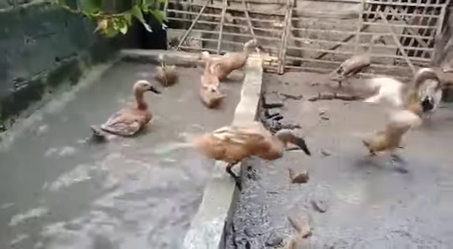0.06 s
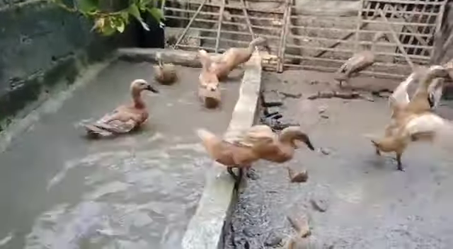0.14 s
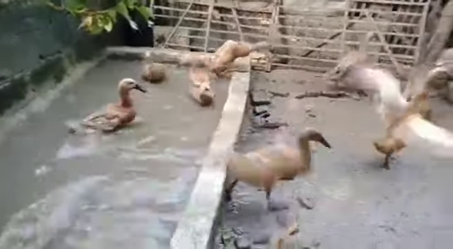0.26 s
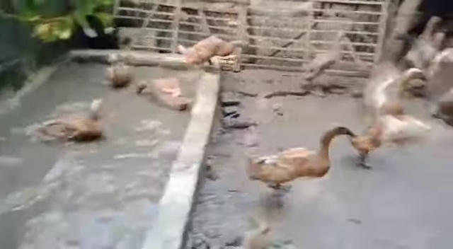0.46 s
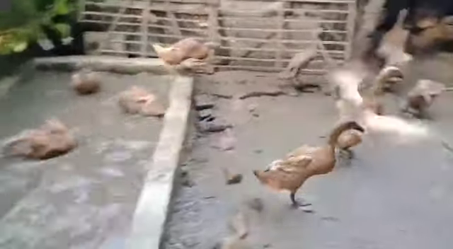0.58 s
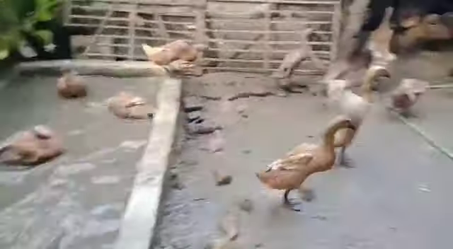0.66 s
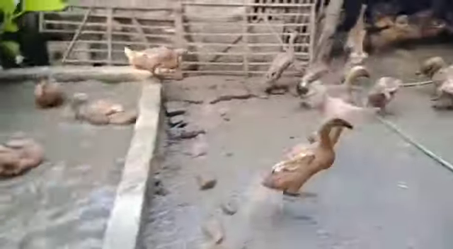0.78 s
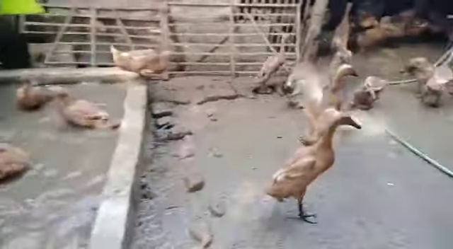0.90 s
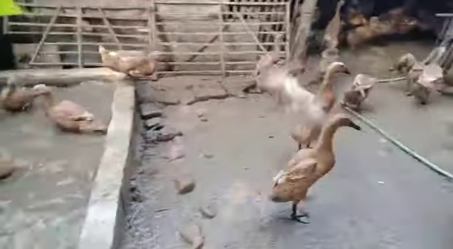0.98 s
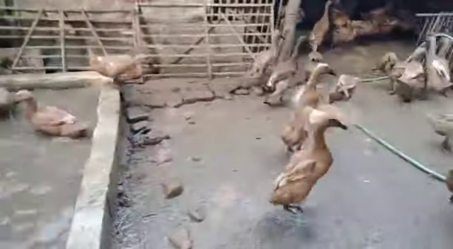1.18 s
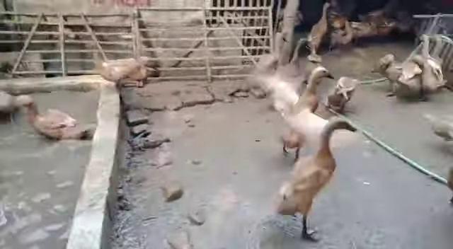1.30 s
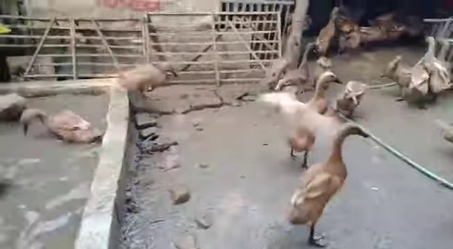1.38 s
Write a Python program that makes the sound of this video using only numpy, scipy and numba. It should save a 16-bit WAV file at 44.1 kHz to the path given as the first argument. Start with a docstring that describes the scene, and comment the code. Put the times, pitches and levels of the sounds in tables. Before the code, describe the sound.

A close duck quacks loudly once in a concrete pen, with soft muttering ducks and a watery bloop

```python
"""A low outdoor hush of flickering noise bands lies below, while the flock mutters short hoarse quacks
(throat pulses through resonances) and feet tap the wet concrete (clicks that make short modes ring).
Early on a foot plunges into the shallow pool: its air pocket is a sine tone that rises in a bloop.
Then a duck close by gives one long loud quack, rough pulses through a moving throat and bill.
More mutters and taps follow; scattered echoes place ducks and taps in a concrete pen."""
import sys
import numpy as np
from scipy import signal
from scipy.io import wavfile
from numba import njit

SR = 44100
rng = np.random.default_rng(int(sys.argv[2]) if len(sys.argv) > 2 else 0)


def nominal_scale(level):
    """Amplitude ratio for a level in decibels (scalar or array-like)."""
    x = np.asarray(level, float) / 20
    return 10 ** x


def digitize_waveform(pressure):
    """Quantize a signal to 16-bit integers and store it at the path in sys.argv[1].

    Rows of a 2-D input are taken as channels; values are limited to [-1, 1].
    """
    field = np.atleast_2d(pressure).T
    bounded = np.clip(field, -1, 1)
    quanta = np.round(bounded * 32767).astype(np.int16)
    wavfile.write(sys.argv[1], SR, quanta)


N = 63945  # length in samples


def rms_one(x):
    """Scales a sound to an average strength (rms) of 1."""
    return x / np.sqrt(np.mean(x ** 2) + 1e-20)


def in_time(rows):
    """Draws straight lines between table rows; the first and last values are held outside them."""
    t, *columns = np.transpose(rows)
    return [np.interp(np.arange(N) / SR, t, column) for column in columns]


def drift(rate_hz):
    """Slow random wandering of spread 1: noise smoothed twice, made at every 40th sample."""
    r = np.exp(-80 * np.pi * rate_hz / SR)
    noise = rng.standard_normal(N // 40 + 2002)
    slow = signal.lfilter([1], [1, -2 * r, r * r], noise)[2000:]
    return np.interp(np.arange(N) / 40, np.arange(len(slow)), rms_one(slow))


@njit
def two_pole(x, gain, a1, a2):
    """Resonator whose pitch can move sample by sample, fed by its own last two outputs."""
    y = np.zeros(len(x))
    for i in range(2, len(x)):
        y[i] = gain * (x[i] - x[i - 2]) + a1[i] * y[i - 1] - a2 * y[i - 2]
    return y


def resonance(x, hz, width_hz):
    """A hollow space favours sounds near its own pitch: peak of gain 1, fixed or moving."""
    r = np.exp(-np.pi * width_hz / SR)
    return two_pole(x, (1 - r * r) / 2, 2 * r * np.cos(2 * np.pi * hz / SR) + 0 * x, r * r)


def steep(x, hz, width_hz):
    """The same resonance twice in a row gives steeper sides; rms 1."""
    return rms_one(resonance(resonance(x, hz, width_hz), hz, width_hz))


JITTER, SHIMMER_DB, BREATH = .16, 4.0, 1.3  # jitter in cycles; all three grow with roughness
BREATH_GATE = .6  # how deeply each cycle swells and thins the breath


def syrinx(pitch_hz, rough, chance):
    """A bird's voice organ: one pulse per cycle, uneven when rough, plus breath gated by each cycle."""
    n = len(pitch_hz)
    rough = np.clip(rough, 0, 1)
    cycle = np.cumsum(pitch_hz) / SR
    at = np.nonzero(np.diff(np.floor(cycle)))[0]
    late = JITTER * rough[at] ** 1.62 * chance[0, at]
    when = at + (np.ceil(cycle[at]) - cycle[at] + late) * SR / pitch_hz[at]
    when = np.clip(when, 0, n - 2)
    shimmer = nominal_scale(SHIMMER_DB * rough[at] * np.tanh(chance[1, at]))
    size = shimmer * np.sqrt(SR / pitch_hz[at])
    # a pulse between two samples is shared by both
    whole = when.astype(int)
    part = when - whole
    pulses = np.bincount(whole, size * (1 - part), n) + np.bincount(whole + 1, size * part, n)
    gate = 1 + BREATH_GATE * np.cos(2 * np.pi * cycle)
    breath = BREATH * rough * chance[2] * gate
    return (pulses + breath) / np.sqrt(1 + 0.26 * (BREATH * rough) ** 2)


HUSH_DB, HUSH_PATCHY_DB = -45, 1.5  # rms level; size of the flicker
# colour of the outdoor noise: (f/Hz, relative level per Hz/dB)
HUSH_COLOUR = [(20, -46), (40, -10), (100, -2), (250, -4.5), (500, -7.5), (900, -6), (1800, -18),
               (3000, -12.5), (5000, -36), (7000, -32), (9000, -63), (15500, -30.5)]


def hush():
    """Outdoor noise in narrow bands, each flickering a little, partly together."""
    out, together = 0, drift(3.0)
    edges = 22 * 2 ** np.arange(0, 9.6, .4)
    colour_hz, colour_db = np.transpose(HUSH_COLOUR)
    white = rng.standard_normal((2, N + 8000))
    for k, (low, high) in enumerate(zip(edges, edges[1:])):
        band_pass = signal.butter(2, [low, high], "band", fs=SR, output="sos")
        band = signal.sosfilt(band_pass, white[k % 2])[8000:]
        db = np.interp(np.log(low * high) / 2, np.log(colour_hz), colour_db)
        flicker_db = HUSH_PATCHY_DB * (0.68 * together + drift(22.0))
        out = out + band * nominal_scale(db + flicker_db)
    return nominal_scale(HUSH_DB) * rms_one(out)


SPLATTER_S = .005  # time in which the splatter fades to about a third
# feet on wet concrete, the third row being the foot's plunge into the pool: (t/s, relative level/dB, extra
# level of the modes below 2000 Hz/dB)
FOOT_TAPS = [(0.0667, -26.5, -10), (0.1296, -34, -23), (0.2248, -27, 3), (0.2643, -33, -13),
             (0.7782, -23, -14), (0.887, -52, -3), (1.0574, -30, -5), (1.143, -23, -28),
             (1.275, -42.5, -20)]
# what a tap rings with: (f/Hz, relative level/dB, time to fade by 60 dB/s)
CONCRETE_MODES = [(480, 15, 0.025), (950, 8, 0.0088), (1500, 28.5, 0.0065), (3100, 16.5, 0.0046),
                  (3460, 10, 0.0084), (4980, 2, 0.008), (6660, -6, 0.01), (7520, -10, 0.0095),
                  (11870, -12.5, .002), (13500, -23, .002)]


def taps():
    """A foot hits with one click and a short splatter; each tap rings the same modes in new strengths."""
    out, t = np.zeros(N), np.arange(N) / SR
    splatter = rng.standard_normal(N) * (rng.random(N) < .08)
    spread_db = rng.normal(0, 2.5, (len(FOOT_TAPS), len(CONCRETE_MODES)))
    for k, (hz, mode_db, t60) in enumerate(CONCRETE_MODES):
        clicks = np.zeros(N)
        for (start, db, weight_db), change_db in zip(FOOT_TAPS, spread_db[:, k]):
            i = int(start * SR)
            since = t[:N - i]
            hit = 0.46 * splatter[i:] * np.exp(-since / SPLATTER_S) + .5 * (since == 0)
            clicks[i:] += nominal_scale(db + mode_db + change_db + weight_db * (hz < 2000) - 21.5) * hit
        r, w = nominal_scale(-60 / (t60 * SR)), 2 * np.pi * hz / SR
        out += signal.lfilter([0, np.sin(w)], [1, -2 * r * np.cos(w), r * r], clicks + 1e-18)
    return out


# air pocket of the plunging foot, rising as it nears the surface: (t/s, f/Hz, rms level/dB)
# its faint first row is also held from the start
AIR_POCKET = [(.222, 117.4, -51), (.228, 116, -24.5), (.25, 123, -27.5), (.28, 128, -25.5),
              (.304, 130, -35.5), (.338, 147.7, -36), (.37, 165.3, -40.5), (.42, 192.4, -40),
              (.44, 173, -77)]


def bloop():
    """A pocket of air under the foot rings as a rising sine tone."""
    hz, db = in_time(AIR_POCKET)
    tone = np.sin(2 * np.pi * np.cumsum(hz) / SR)
    return np.sqrt(2) * nominal_scale(db) * tone * (db > -59.9)


RISE_SHARE, FALL_S = .22, .024  # rise as a share of the length; time to fall by 30 dB
ARCH = .06  # share by which pitch peaks mid-quack
THROAT_SAG_PER_S = 0.26  # the throat resonance sinks through each quack
FLOCK_WIDTH_HZ, FLOCK_CHEST_DB = 290, -15
# short quacks: (t/s, length/s, relative level/dB, peak pitch f/Hz, roughness (limited to 1),
# mid-quack throat f/Hz, open bill level/dB)
FLOCK_QUACKS = [(0.0, 0.04, -35.5, 249.5, 0.48, 950, -2.5), (0.062, 0.057, -50, 242, 1.23, 1480, 0),
                (0.117, 0.014, -45, 243, 0.53, 1500, 1.5), (0.149, 0.003, -36.5, 261.5, 0.92, 3020, 4.5),
                (0.171, 0.05, -39.5, 249, 0.49, 820, 4), (0.266, 0.041, -38.5, 214.2, 0.7, 480, -13),
                (0.729, 0.023, -43, 242, 0.9, 1800, -8), (0.783, 0.024, -40.5, 237.3, 0.75, 950, -3),
                (0.844, 0.083, -56, 303, 0.4, 2630, -7), (0.885, 0.054, -41.5, 214.3, 0.41, 876, -10.5),
                (0.965, 0.027, -34, 211, 0.64, 615, -10.5), (0.984, 0.027, -35.5, 255.5, 0.6, 1120, -2.5),
                (0.995, 0.031, -31.5, 258.8, 0.37, 705, -39), (1.014, 0.032, -27.5, 285.8, 0.19, 494, -13),
                (1.057, 0.047, -35.5, 208.4, 0.6, 1040, -4), (1.147, 0.033, -31.5, 228.9, 0.56, 887, -12),
                (1.162, .04, -35, 257, 0.38, 1170, -4.5), (1.201, 0.07, -39, 428.9, 0.35, 1190, -4),
                (1.24, 0.059, -36.5, 214.8, 0.49, 962, -21), (1.332, 0.058, -34, 415.6, 0.3, 830, -30),
                (1.346, 0.06, -38, 432.2, 0.34, 1196, 0.5), (1.365, 0.18, -39, 338.7, 0.28, 2384, 6),
                (1.385, 0.059, -42, 237.6, 0.6, 480, -40)]
# open-bill resonances: (f/Hz, width f/Hz, relative level/dB)
FLOCK_BILL_PEAKS = [(1800, 670, -1), (2617, 300, -8.5), (3575, 1210, -12), (5540, 1900, -25.5)]


def flock():
    """Short quacks: quick rise, hold with a sinking throat, fall; pitch arches and the bill opens."""
    out, chance = np.zeros(N + SR), rng.standard_normal((3, N + SR))
    for start, length, db, pitch_hz, rough, throat_hz, open_db in FLOCK_QUACKS:
        i, n = max(int(start * SR), 0), int((length + 4 * FALL_S) * SR)
        t = np.arange(n) / SR
        arched_hz = pitch_hz * (1 - ARCH * (2 * t / length - 1) ** 2).clip(.7)
        source = syrinx(arched_hz, rough + 0 * t, chance[:, i:i + n])
        rise = np.minimum(t / (RISE_SHARE * length), 1)
        fall = nominal_scale(-30 * np.clip(t - length + FALL_S / 2, 0, 1) / FALL_S)
        source = source * rise * fall
        # neighbouring resonances take opposite signs
        bill = sum((-1) ** k * nominal_scale(d) * steep(source, hz, w)
                   for k, (hz, w, d) in enumerate(FLOCK_BILL_PEAKS))
        sagging_hz = throat_hz * (1 - THROAT_SAG_PER_S * (t - length / 2))
        throat = steep(source, sagging_hz, FLOCK_WIDTH_HZ)
        chest = nominal_scale(FLOCK_CHEST_DB) * steep(source, pitch_hz, 120)
        opening = nominal_scale(open_db) * np.minimum(2 * t / length, 1)
        voice = throat - opening * bill + chest
        out[i:i + n] += nominal_scale(db) * np.sqrt(length * SR / n) * voice
    return out[:N]


BILL_WIDTH_HZ, UPPER_BILL_HZ, UPPER_WIDTH_HZ = 350, 2230, 330
THROAT_WIDTH_HZ, CHEST_HZ, CHEST_DB = 300, 250, -19
HOLLOW_HZ, HOLLOW_WIDTH_HZ = 1000, 300  # partial dip between throat and bill
TREBLE_FLICKER_DB = 3.5
RASP_ROUGH = .8  # added roughness
THROAT_ROUGH = 2.2  # throat roughness per roughness squared
# the loud quack; its faint first row is also held from the start:
# (t/s, relative level/dB, pitch f/Hz, roughness 0-1, throat level/dB, treble level/dB, bill f/Hz)
LOUD_QUACK = [(.336, -59, 172.2, 0.61, 10.5, -9.5, 1224), (.339, -37.5, 174.8, 0.78, -11.5, -18, 1290),
              (.366, -31.5, 186.4, 0.89, -8, -21.5, 1415), (.376, -19, 191.1, 0.49, -18, -29.5, 1420),
              (.398, -26, 193.4, 0.53, -12, -24.5, 1430), (.414, -21, 205, 0.54, -17.5, -24, 1350),
              (.434, -26, 214.4, 0.15, -5, -13.5, 1870), (.454, -16, 235, 0.1, -17, -27.5, 1563),
              (.482, -17.5, 243.7, 0, -8, -22, 1704), (.53, -25.5, 246.7, 0.13, -5.5, -19, 1580),
              (.57, -31, 253.9, 0.24, 4.5, -16.5, 1800), (.58, -23, 241, 0.07, -7.5, -22.5, 1800),
              (.626, -24, 243.3, 0.08, -4, -24, 1560), (.646, -22, 263.5, 0.31, -4.5, -26.5, 1710),
              (.662, -24, 271, 0.16, -3, -12.5, 1800), (.682, -27, 247.3, 0.25, 0.5, -20.5, 1645),
              (.704, -45.5, 229.3, 0.34, -4, -12.5, 1700), (.725, -71, 232, 0.65, -7.5, -16, 1700)]
# second bill resonance, which opens with the bill: (t/s, level/dB)
UPPER_BILL_LEVEL = [(.34, -13), (.42, -26), (.47, 0), (.53, 0), (.58, -9), (.65, -9), (.7, -17)]
# throat resonance, rising as the neck stretches: (t/s, f/Hz)
THROAT_PATH = [(.35, 439), (.42, 473), (.5, 583), (.6, 571), (.67, 665)]
# first treble resonance, moving with the bill: (t/s, f/Hz)
TREBLE_PATH = [(.36, 3260), (.43, 3525), (.47, 3950), (.56, 3760), (.62, 3430), (.67, 3410)]
# treble resonances: (multiple of the first, width f/Hz, relative level/dB, added roughness)
TREBLE_PEAKS = [(.73, 380, 2, .03), (1, 380, 1, .03), (1.16, 450, -5, .08), (1.33, 500, -4, .1)]
# raspy top of the voice: (f/Hz, width f/Hz, relative level/dB)
RASP_PEAKS = [(4270, 1450, -11.5), (5580, 640, -12.5), (6520, 330, -20.5), (8040, 370, -28.5)]


def loud_quack():
    """Syrinx pulses through chest, throat, moving bill and flickering treble resonances."""
    level, pitch, rough, throat, treble, bill = in_time(LOUD_QUACK)
    (upper,), (first_hz,), (throat_hz,) = map(in_time, (UPPER_BILL_LEVEL, TREBLE_PATH, THROAT_PATH))
    chance = rng.standard_normal((3, N))

    top = np.zeros(N)
    for k, (multiple, width_hz, db, added_rough) in enumerate(TREBLE_PEAKS):
        rougher = syrinx(pitch, rough + added_rough, chance)
        flicker = nominal_scale(db + TREBLE_FLICKER_DB * drift(13.0))
        top += (-1) ** k * flicker * steep(rougher, multiple * first_hz, width_hz)
    air = syrinx(pitch, rough + RASP_ROUGH, chance)
    for hz, width_hz, db in RASP_PEAKS:
        top += nominal_scale(db + TREBLE_FLICKER_DB * drift(15.0)) * steep(air, hz, width_hz)

    source = syrinx(pitch, rough, chance)
    mouth = steep(source, bill, BILL_WIDTH_HZ)
    mouth = mouth - nominal_scale(upper) * steep(source, UPPER_BILL_HZ, UPPER_WIDTH_HZ)
    mouth = mouth / np.sqrt(1 + nominal_scale(2 * upper))  # keeps the total power of the two bill resonances steady

    throat_source = syrinx(pitch, THROAT_ROUGH * rough ** 2, chance)
    low = steep(throat_source, throat_hz, THROAT_WIDTH_HZ)
    low = low - nominal_scale(CHEST_DB) * steep(throat_source, CHEST_HZ, 200)

    voice = mouth + nominal_scale(throat) * low + nominal_scale(treble) * top
    hollow = signal.iirnotch(HOLLOW_HZ, HOLLOW_HZ / HOLLOW_WIDTH_HZ, SR)
    voice = signal.lfilter(*hollow, voice) + .7 * voice
    low_cut = signal.butter(4, CHEST_HZ * .8, "high", fs=SR, output="sos")
    return nominal_scale(level) * signal.sosfilt(low_cut, voice)


WALL_CUT_HZ = 6000
PEN_FIRST_ECHO_S, PEN_T60_S, PEN_DB, ECHOES_PER_S = .004, 0.18, -5, 990  # T60: time to fade by 60 dB


def walls(x):
    """Scattered dull echoes from walls, floor and water, dying quickly."""
    t = np.arange(SR // 4) / SR
    scattered = rng.standard_normal(len(t)) * (rng.random(len(t)) < ECHOES_PER_S / SR)
    echoes = scattered * (t > PEN_FIRST_ECHO_S) * nominal_scale(-60 * t / PEN_T60_S)
    dulling = signal.butter(1, [500, WALL_CUT_HZ], "band", fs=SR, output="sos")
    dull = signal.sosfilt(dulling, x)
    return nominal_scale(PEN_DB) * signal.fftconvolve(dull, echoes / np.linalg.norm(echoes))[:N]


NEAR_DRIER_DB = -7  # the close duck stands further out of the echoes


def scene():
    """Ducks and taps with their echoes, plus the bloop and the hush without any."""
    duck, others = loud_quack(), flock() + taps()
    echoes = walls(nominal_scale(NEAR_DRIER_DB) * duck + others)
    return (duck + others + echoes + bloop() + hush())[None]


def low_pass(x):
    """Removes everything above the highest recorded frequency."""
    return signal.sosfilt(signal.butter(12, 15800, fs=SR, output="sos"), x)


MIC_LOW_CUT_HZ = 55


def record(dry):
    """The microphone drops the deepest bass."""
    low_cut = signal.butter(2, MIC_LOW_CUT_HZ, "high", fs=SR, output="sos")
    mix = signal.sosfilt(low_cut, dry)
    return low_pass(mix)


dry = scene()
out = record(dry)
digitize_waveform(out)
```